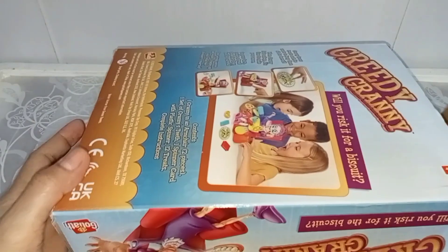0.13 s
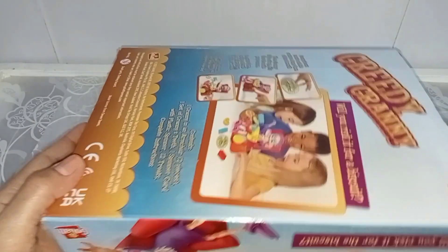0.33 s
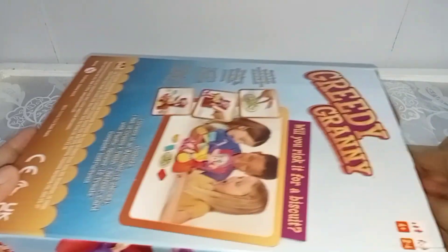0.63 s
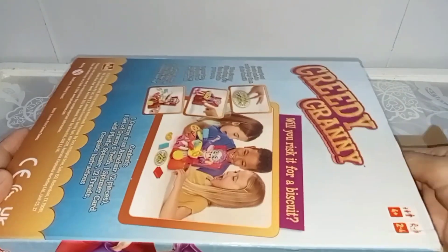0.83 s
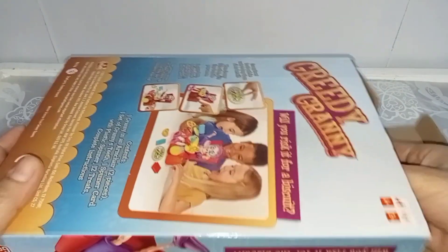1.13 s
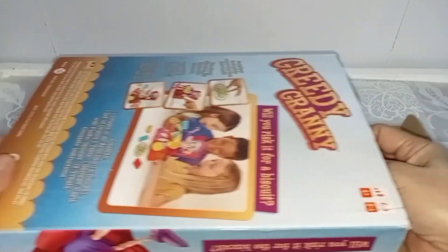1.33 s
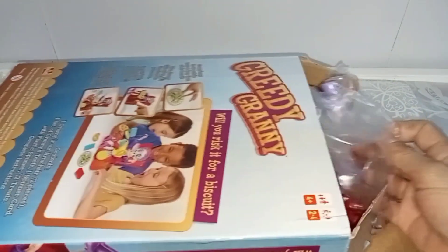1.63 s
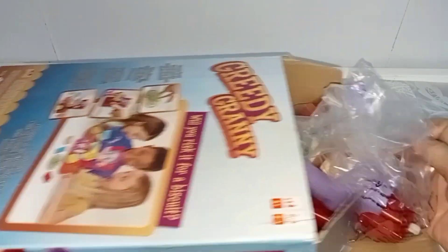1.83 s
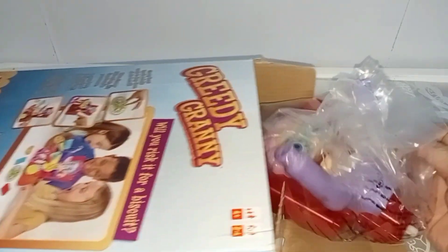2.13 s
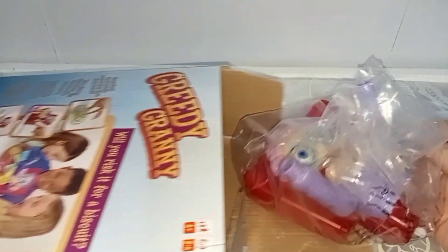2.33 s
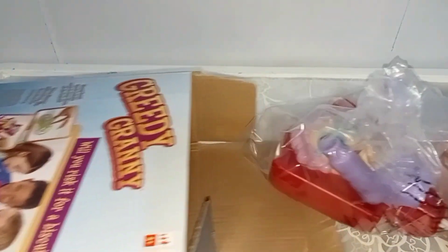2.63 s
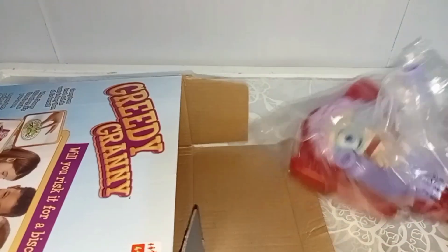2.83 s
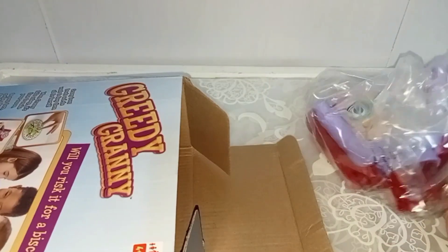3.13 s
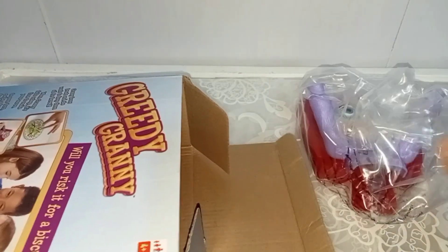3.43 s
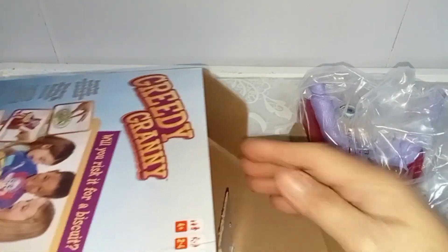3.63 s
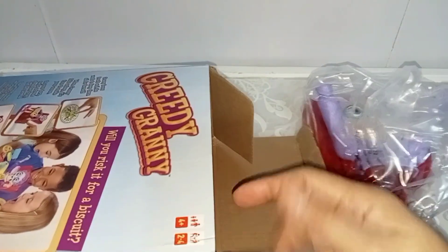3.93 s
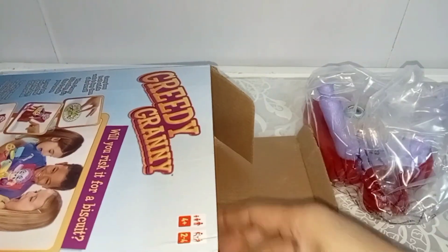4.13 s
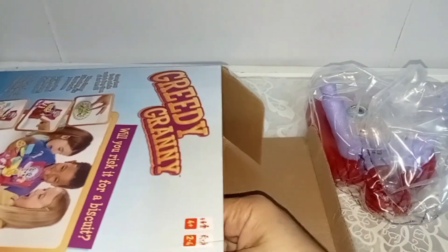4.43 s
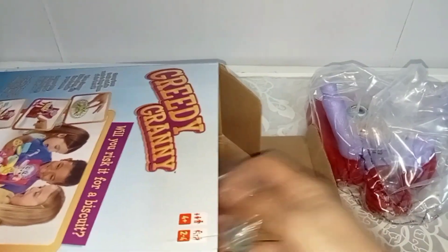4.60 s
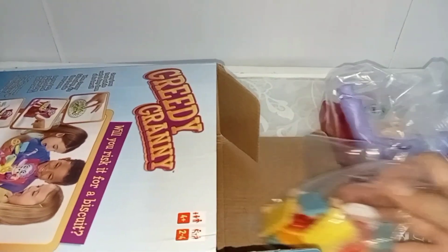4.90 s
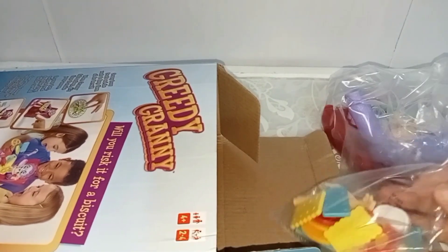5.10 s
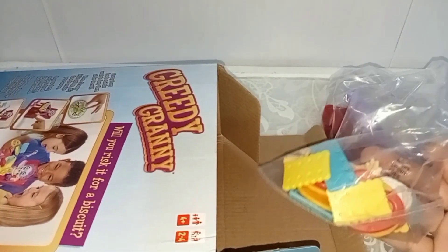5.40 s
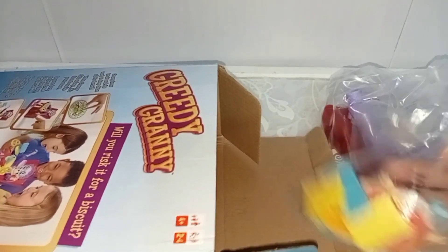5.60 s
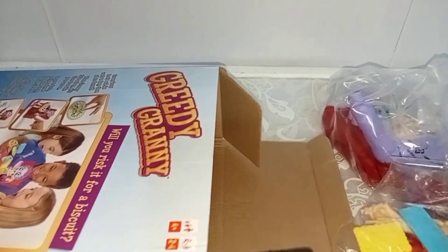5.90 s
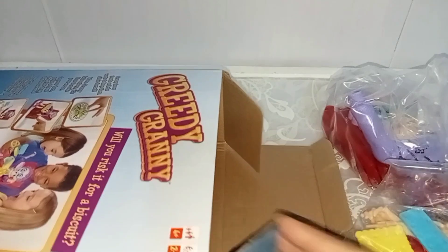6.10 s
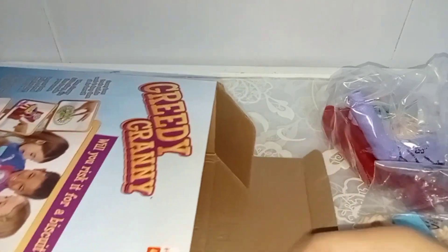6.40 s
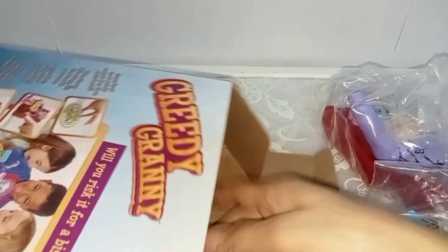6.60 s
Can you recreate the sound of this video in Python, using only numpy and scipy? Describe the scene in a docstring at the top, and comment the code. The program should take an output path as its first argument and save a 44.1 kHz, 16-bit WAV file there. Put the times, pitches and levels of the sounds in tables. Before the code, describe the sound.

Hands turn and open a hollow cardboard box close up, then crackling plastic bags of hard parts are pulled out, rustling and clacking.

```python
"""A small room, a cardboard box on a table, hands working close to a phone's microphone.
The hands turn and open the box and pull out film bags of hard plastic parts.
Film rustles in dense tiny creases and snaps in noisy cracks; the hollow box thumps and scrapes through its modes;
the parts clack as decaying partials. Behind them, two wavering motor lines and coloured noise for the hush."""
import sys
import numpy as np
from scipy import signal
from scipy.fft import rfft, irfft
from scipy.io import wavfile
from scipy.ndimage import uniform_filter1d

SR = 44100
rng = np.random.default_rng(int(sys.argv[2]) if len(sys.argv) > 2 else 0)


def to_wav(sig):
    """Store sig (one row per channel, or 1-D mono) as 16-bit WAV at the path in sys.argv[1].

    Samples outside -1..1 are clipped; the rate is SR.
    """
    pcm = np.clip(np.atleast_2d(sig), -1, 1) * 32767
    pcm = np.round(pcm).astype(np.int16)
    wavfile.write(sys.argv[1], SR, pcm.T)  # frames by channels


N = 297675  # samples, 6.75 s


def undb(db):
    """Decibels to an amplitude factor."""
    return 10 ** (np.asarray(db) / 20)


def level(x, db):
    """Sets the rms level in dB."""
    return x * undb(db) / np.sqrt(np.mean(x ** 2))


def fade(t60, size):
    """Falls 60 dB in t60 seconds."""
    return np.exp(-np.log(1000) * np.arange(size) / SR / t60)


def swell(rise_ms, size):
    """Grows smoothly from 0 to 1 in rise_ms."""
    rise = rise_ms * SR / 1000
    return np.sin(np.pi / 2 * np.minimum(np.arange(size) / rise, 1)) ** 2


def band(x, hz, width_hz):
    """One resonance, gain 1 at the centre."""
    return signal.lfilter(*signal.iirpeak(hz, hz / width_hz, fs=SR), x)


def double_band(x, hz, width_hz):
    """The same resonance twice in a row, for steeper sides."""
    return band(band(x, hz, width_hz), hz, width_hz)


def colour(x, points):
    """Shapes a noise by (f/Hz, level/dB) points."""
    hz, db = np.transpose(points)
    grid = np.maximum(np.arange(len(x) // 2 + 1) * SR / len(x), 1)
    return irfft(rfft(x) * undb(np.interp(np.log(grid), np.log(hz), db)), len(x))


def smooth(x, size):
    """Averages twice over size samples."""
    return uniform_filter1d(uniform_filter1d(x, size=size), size=size)


def walk(rate):
    """Random values around 0, held 1 / rate s and slewed twice."""
    k = int(SR / rate)
    held = np.repeat(rng.standard_normal(N // k + 1), k)
    return 0.84 * smooth(held, k)[:N]


def add(out, s, sound, db):
    """Places a sound at s seconds with its peak at db."""
    i = int(s * SR)
    sound = sound[:N - i]
    out[i:i + len(sound)] += sound * undb(db) / np.abs(sound).max()


def ring(modes, gain_db, stretch, rough):
    """Decaying partials of a struck body; a rough contact makes each one flutter in its own way."""
    size = len(rough)
    t = np.arange(size) / SR
    out = np.zeros(size)
    for k, ((hz, db, t60), gain) in enumerate(zip(modes, gain_db)):
        flutter = undb(db + gain + np.roll(rough, 997 * k))
        out += flutter * np.sin(2 * np.pi * hz * t) * fade(t60 * stretch, size=size)
    return out


def creases(per_s, spread_db, t60):
    """Envelope of many small slips of unequal size, each starting softly and dying fast."""
    sizes = undb(spread_db * np.clip(rng.standard_normal(N), -3, 2.2))
    starts = (rng.random(N) < per_s / SR) * sizes
    soft_power = uniform_filter1d(starts ** 2, size=130)
    power = signal.lfilter([1], [1, -fade(t60 / 2, size=2)[1]], soft_power)
    return np.sqrt(power + 1e-12)


# the hands never rest: (t/s, faint film rustle level/dB, box scrape level/dB)
FIDGETING = [(0, -59, -56), (.6, -61, -54.5), (.9, -60, -54.5), (1.1, -58, -56.5), (1.4, -58, -52.5),
             (1.6, -53, -44), (1.75, -62.5, -53), (2.02, -69, -56), (2.55, -70, -53), (3.01, -70.5, -55.5),
             (3.2, -72, -61), (3.41, -70, -61), (3.87, -67.5, -58), (4.09, -67, -60), (4.55, -62, -49.5),
             (4.85, -49, -45.5), (5.1, -56.5, -54.5), (5.37, -72.5, -55), (5.63, -64, -62.5),
             (5.82, -42.5, -39.5), (5.98, -62.5, -59.5), (6.25, -65.5, -55), (6.5, -61, -54),
             (6.75, -57, -54)]
FIDGET_LOW_DB = 0  # film rustle under 4 kHz, over the part above
# each tug, push or turn: (t/s of its peak, rustle level/dB, t/s to rise 20 dB, t/s to fade 20 dB,
# part under 4 kHz over rustle level/dB, box scrape over rustle level/dB); rises and fades last 0.01 s at least
HAND_MOVES = [(0.002, -38.5, 6, 0.03, 1.5, 0), (0.14, -55, -0.5, 1, -1.5, 0),
              (0.379, -47.5, -0.02, 0.24, -2.5, -13), (0.477, -44.5, 0.03, 0.03, 3, 9.5),
              (0.723, -42.5, 0.08, 0.2, -1.5, -2), (0.97, -39, 0.04, 0, -7, -5),
              (1.09, -57, 0.6, 0.6, -18, 12.5), (1.239, -39, 0.13, 0.13, -5, 0),
              (1.37, -59, -0.1, -0.7, 9, 4), (1.48, -50, 0.07, 0.2, 3.5, 4.5),
              (1.672, -41.5, 0.1, 0.08, -5.5, 0.5), (1.827, -48, 0.12, 0.21, 2.5, 4),
              (2.15, -54, 0.08, 0.7, -0.5, 4), (2.36, -55, 0.5, 0.33, -1.5, 8.5),
              (2.674, -56.5, -0.64, 0.3, -2, 8), (2.87, -56, 0.16, 0.3, 5, 9.5),
              (3.031, -41, 0, 0.0949, 1, 5), (3.085, -57.5, 0.13, 0.22, 6, 14),
              (3.295, -48, 0.15, 0.1, -4, 2), (3.622, -59.5, 0.18, 0.14, 1, 12),
              (3.926, -57.5, -0.2, 0.24, -6, 5.5), (4.11, -53.5, -0.1, 0.4, 0, 5),
              (4.245, -46.5, 0.14, 0.24, -3.5, -20), (4.38, -47, 0.08, 0.06, 3, 1),
              (4.458, -44, 0.05, 0.23, -1.5, 6.5), (4.606, -31, 0.0042, 0.0239, -2, -12),
              (4.645, -40, 0.0859, 0.08, 4, -2), (4.698, -35.5, 0.0743, 0.05, -3, -8.5),
              (4.76, -43, -0.12, -0.34, -12, -5), (4.979, -45.5, 0, -0.12, -7, -2),
              (5.119, -50, -0.35, 0.15, 4, -20.5), (5.269, -42, 0.05, 0.05, 3.5, -21.5),
              (5.679, -46.5, 0.06, 0.3, 5, 3), (5.754, -35, -0.18, 0.03, -17, -6),
              (5.887, -23.5, -0.0454, 0.02, -9, -26), (6.115, -64.5, 0.03, 0, -8, 12.5),
              (6.198, -61, 0.1, 0.3, 4, 5.5), (6.3, -52, 0, 0.07, 7, 2), (6.341, -48, 0.03, 0.11, 2.5, 7),
              (6.428, -32, 0.0238, -0.07, -9, -1.5), (6.551, -51, 0.17, 0.02, 0, 8.5),
              (6.67, -52, 0.3, 0.5, -5.5, 8)]


def handling():
    """Levels of rustle, its lower part and the box scrape: tugs swell and fade over the fidgeting."""
    t = np.arange(N) / SR
    s, film_db, box_db = np.transpose(FIDGETING)
    idle_db = [np.interp(t, s, db) for db in (film_db, film_db + FIDGET_LOW_DB, box_db)]
    power = undb(2 * np.array(idle_db))  # twice the dB makes a power
    for s, db, rise_s, fade_s, low_db, scrape_db in HAND_MOVES:
        away = np.where(t < s, (s - t) / max(rise_s, .01), (t - s) / max(fade_s, .01))
        power = power + undb(2 * (db - 20 * away)) * undb(2 * np.array([[0], [low_db], [scrape_db]]))
    return 10 * np.log10(power)


# spectrum of bare film noise: (f/Hz, level/dB per Hz)
FILM_SPECTRUM = [(590, 1), (1000, 0), (1220, -8), (1330, -3), (1580, -2), (2020, -3), (2540, -1),
                 (4410, 1.5), (6660, -3), (9300, -2.5), (10800, -6), (15600, -9.5)]
CREASES_PER_S, CREASE_SPREAD_DB, CREASE_T60_S = 250, 6, .014


def rustle(high_db, low_db):
    """Tiny creases crackle all over the bag; each patch of film sounds in its own narrow range."""
    low, high = 0, 0
    shared = creases(CREASES_PER_S, CREASE_SPREAD_DB, CREASE_T60_S)
    stir = walk(35)
    # a gentle hand makes the film glide smoothly, a firm one makes it crackle
    glide = undb(np.clip(-.5 * (high_db + 46), -3, 8))
    for hz in 1100 * 2 ** np.arange(0, 4, .2):
        own = creases(40, 6, .04)
        grain = level(shared, -2) + level(own, 0) + glide
        patch = double_band(rng.standard_normal(N) * grain, hz, hz / 5)
        patch = patch * undb(1.66 * stir + 2.7 * walk(12))
        if hz < 4000:
            low = low + patch
        else:
            high = high + patch
    even = 1 / np.sqrt(1.6 + glide ** 2)  # offsets the power that gliding adds
    low = level(colour(low * even, FILM_SPECTRUM), 0)
    high = level(colour(high * even, FILM_SPECTRUM), 0)
    return low * undb(low_db) + high * undb(high_db)


# creases of the film letting go: (t/s, peak level/dB, ring f/Hz, low part over high part level/dB,
# rise t/ms before a common 0.5 ms is added, fall t60/s, 0.003 s at least)
CREASE_SNAPS = [(.122, -29.5, 3630, -6.5, 6.1, 0.057), (.098, -37.5, 9500, -13.5, 1.8, .02),
                (.165, -35, 4620, 2, 5.1, 0.068), (.362, -26, 12800, 0, 5.4, 0.027),
                (.366, -21, 8450, 4, 6.3, 0.026), (.4542, -20, 3030, -1, 3.6, 0.032),
                (.527, -34.5, 8900, 3, 1, 0.029), (.695, -27.5, 5000, -1, 7.6, 0.032),
                (.7105, -37, 11500, 4, 0.75, 0.0069), (.744, -30, 9500, 7, 1.2, 0.017),
                (.7851, -23.5, 6360, -4, 0.55, .011), (.8072, -26, 1630, 0, 0.49, 0.01),
                (.858, -31.5, 3800, 11, 0.88, 0.017), (.9088, -33.5, 3920, 9, 1.1, 0.008),
                (.9498, -16.5, 10500, -36, 1.4, 0.008), (.9603, -13, 6600, -1.5, 0.57, 0.012),
                (.9675, -35, 8000, -28, 0.61, 0.0092), (.9738, -21.5, 9600, -24, 0.86, .015),
                (.987, -27.5, 4500, 2, .6, 0.0094), (1.0107, -25.5, 7750, -9, 0.98, 0.015),
                (1.063, -28.5, 2580, 7, 4.7, 0.024), (1.09, -31.5, 2620, -3, 8.1, .03),
                (1.107, -25, 7060, -8, 0.44, 0.0057), (1.148, -26, 2650, 1, 3.2, 0.026),
                (1.1644, -27, 3370, -4, 1.7, 0.013), (1.2035, -11, 9400, -3, 1.1, 0.013),
                (1.2287, -19.5, 2350, -14, 1, 0.0081), (1.2437, -18, 9800, -16, 0.77, .01),
                (1.2542, -16, 7200, -9, 0.35, 0.016), (1.2634, -35, 6500, -12, 0.56, 0.007),
                (1.2805, -13, 9800, -9, 0.53, 0.024), (1.2864, -21.5, 1620, -1, 1.3, 0.022),
                (1.2933, -40, 7940, -1, 4.1, 0.015), (1.3074, -29, 5440, -11, 0.45, 0.005),
                (1.3184, -25, 7500, -13.5, 0.5, .007), (1.3408, -27, 8100, -15, .7, 0.0051),
                (1.3584, -19, 9200, -3, 0.29, 0.015), (1.3767, -26, 9900, -1, 0.57, 0.0081),
                (1.3864, -26, 5500, -4, 0.8, 0.0079), (1.3937, -25, 6250, -10, 0.68, .006),
                (1.4216, -18, 10000, -17, 0.41, 0.011), (1.4295, -25, 9990, -15, 0.54, .007),
                (1.4448, -28, 9000, -12, .5, .005), (1.4476, -16.5, 4720, -3, 0.66, 0.0074),
                (1.462, -18, 4300, -1, 0.69, 0.0044), (1.479, -25, 3470, -14.5, 0.52, 0.0048),
                (1.485, -20, 6600, -12, 0.68, 0.0082), (1.4934, -21.5, 2850, 5, 3.3, 0.015),
                (1.509, -20, 9700, -7, 0.77, 0.015), (1.533, -26, 5500, 2, .7, 0.025),
                (1.5465, -17, 9400, -25, 0.67, 0.0058), (1.565, -26.5, 8960, 9.5, 0.99, 0.013),
                (1.6217, -29, 3460, 8, 0.89, 0.008), (1.6387, -31, 6500, 7, .8, .015),
                (1.67, -21, 5800, 0, 0.91, 0.02), (1.684, -25.5, 1440, 23, 0.74, 0.028),
                (1.7928, -34.5, 1650, -2, 1.4, 0.034), (1.8203, -27.5, 1540, 1, .6, 0.0075),
                (1.837, -33, 1510, 4.5, 1.2, 0.047), (1.9714, -42, 2080, 2, 1, 0.011),
                (2.0464, -22.5, 6530, -14, 0.65, 0.0073), (2.3294, -37, 3420, 5, 2, 0.025),
                (2.434, -39, 10100, -18, 1.8, 0.056), (2.577, -38, 1560, -1, .4, .015),
                (2.6063, -30, 3500, 20, 0.58, 0.023), (2.6146, -31, 8270, -14, 0.57, 0.0072),
                (2.6522, -14, 5700, -8, 0.18, 0.011), (2.7137, -40, 2870, -1, 1.7, .025),
                (2.75, -35, 4160, -5, 0.77, 0.021), (2.8212, -27, 4280, -8, 3.2, 0.0083),
                (2.8439, -33, 3200, 5, 1.4, 0.015), (2.865, -21.5, 9500, -11.5, 0.23, 0.0028),
                (2.8772, -23, 4770, 0, 0.51, 0.0078), (2.8938, -32, 2260, 0, 0.78, 0.023),
                (2.9114, -35, 5000, 7.5, .6, 0.0065), (2.9274, -36, 4000, -4, .6, .008),
                (2.936, -33, 4570, 12, 0.88, 0.021), (2.9577, -41, 2860, 8, 0.64, .008),
                (2.9711, -35, 3400, 9, .7, .01), (2.9926, -28.5, 2930, -1, .4, 0.0058),
                (3.012, -30, 3100, -10, 0.6, 0.0089), (3.0233, -25.5, 9800, 8, 0.75, 0.17),
                (3.03, -28, 1010, 0, 6.1, 0.13), (3.0527, -28, 9470, -9, 1.1, 0.012),
                (3.1364, -21.5, 9700, -4, 0.73, 0.015), (3.1556, -30.5, 3130, 10, .5, 0.011),
                (3.1846, -30, 4860, -17.5, 1.1, 0.0069), (3.2084, -31.5, 2280, 5.5, 0.63, 0.014),
                (3.2238, -30, 1390, -10, 0.77, 0.0079), (3.235, -30.5, 2770, -6, .7, 0.015),
                (3.2592, -16.5, 10100, -29, 0.47, 0.0046), (3.2675, -25, 9900, -17, 0.48, 0.0078),
                (3.2877, -22, 9300, -5, 0.33, 0.0095), (3.3017, -19, 1850, -1, 0.24, 0.0058),
                (3.3347, -27, 1600, 4, 0.65, 0.011), (3.4106, -45, 6000, -10, 0.55, .006),
                (3.4255, -37, 1720, 4, 0.99, 0.012), (3.505, -22.5, 9800, -12, 0.21, 0.018),
                (3.6, -41, 2700, 5, 2, 0.026), (3.6325, -38, 2740, 4, 3, 0.011),
                (3.702, -45, 3750, 8, 1.6, .015), (3.911, -46, 9700, -1, 1.5, 0.061),
                (4.0594, -47.5, 6530, -4, 1.9, .015), (4.105, -35, 2630, 2, 0.65, 0.039),
                (4.2, -28.5, 2630, -1, 0.63, .016), (4.3814, -28, 8700, -18, 0.93, 0.033),
                (4.4338, -23.5, 5670, -6.5, 0.64, 0.096), (4.4467, -21, 10000, -14, 0.82, 0.053),
                (4.475, -7, 10600, -39, 0.41, 0.0086), (4.5032, -25, 3930, 4, 6.7, 0.036),
                (4.5629, -22.5, 10200, -5.5, 0.75, 0.012), (4.5772, -32, 7000, -15, .4, .004),
                (4.5905, -31, 9400, -16, 1.5, 0.014), (4.5811, -19, 7150, -19, 0.45, 0.03),
                (4.598, -17.5, 8800, -18, 0.62, 0.023), (4.6084, -24, 7450, -15, 0.88, 0.011),
                (4.6224, -21, 3930, -7, 1.5, .02), (4.6603, -22.5, 1960, -1, 1.7, 0.022),
                (4.6704, -24, 2850, -2.5, 1, 0.016), (4.695, -23, 2020, -8, 2.6, 0.051),
                (4.7104, -15, 9200, -14, .3, 0.0026), (4.728, -23.5, 2080, -11, 1.2, 0.23),
                (4.7495, -27.5, 9900, -6, 8.5, 0.092), (4.7794, -27, 1850, 8, 1, .03),
                (4.864, -22, 5700, -7, 0.65, 0.0076), (4.872, -23.5, 4500, 1, 0.71, 0.012),
                (4.891, -30, 4360, -14, 2, .006), (4.93, -21, 9300, -19, 0.93, 0.0073),
                (4.967, -23, 2450, -4, 0.77, 0.0072), (4.9754, -23.5, 4430, -12, 0.49, 0.0065),
                (4.9934, -29, 5530, -6, .7, .008), (5.0157, -21.5, 3260, -9, 0.56, 0.012),
                (5.0381, -21, 9050, 3, 0.52, 0.017), (5.1045, -21, 4170, -29, 4, 0.057),
                (5.158, -30, 9600, 13, 0.41, 0.0042), (5.177, -31, 6000, 5, 1.2, 0.064),
                (5.2176, -20.5, 2250, 0, 0.16, 0.0092), (5.2258, -20.5, 2270, -7, 0.51, 0.0054),
                (5.248, -19.5, 9200, -31, 1.8, 0.026), (5.3007, -19.5, 8700, -30, 0.65, 0.016),
                (5.3235, -30.5, 2900, 23, 0.76, 0.018), (5.3426, -35.5, 9200, -0.5, 1.5, 0.015),
                (5.39, -40.5, 2220, 11, 0.55, 0.0093), (5.406, -44, 7000, 7, .6, 0.0097),
                (5.424, -42, 2270, 5, 0.67, 0.011), (5.5742, -39, 3900, -17, 0.51, 0.024),
                (5.655, -24.5, 5340, -0.5, 14, 0.065), (5.7322, -22, 9350, 4, 0.64, 0.074),
                (5.7554, -24, 5200, 6, 2, 0.099), (5.7756, -20, 7800, -1, .5, 0.011),
                (5.7912, -29, 6140, 8, 2.1, 0.016), (5.8256, -26, 10160, -11, .7, 0.024),
                (5.8335, -13.5, 6800, -22, 0.84, 0.0051), (5.8485, -17.5, 9400, -2, .7, 0.037),
                (5.869, -7.5, 11000, -30, 3.4, 0.026), (5.9335, -26, 5330, -1, 1.7, 0.065),
                (6.0978, -27.5, 10400, -2.5, 0.4, 0.037), (6.1174, -38.5, 2500, -8.5, 1.6, 0.014),
                (6.3142, -26.5, 3170, -1.5, 0.57, 0.021), (6.3332, -21, 2470, -7, 1.6, 0.0026),
                (6.39, -32, 9100, 5, 16, 0.11), (6.422, -25.5, 8900, -3.5, 8.8, 0.068),
                (6.4404, -27.5, 2860, 9, 1.7, 0.026), (6.521, -39, 9470, -12, 2.4, .031),
                (6.539, -20.5, 2560, 1, 0.81, 0.024), (6.5495, -22.5, 2160, 6, 0.7, 0.018),
                (6.6009, -36, 3880, -8, 1.5, .015), (6.651, -13.5, 10270, -3, 5.8, 0.016),
                (6.654, -26, 13500, -12, 1.5, 0.027)]
# the patch's ring over the crack at 4 kHz; larger, lower patches ring more
SNAP_RING_DB, RING_DB_PER_OCTAVE = -5, -1.5


def snaps(rows):
    """A noisy crack, partly ringing at the pitch of the buckled patch."""
    out = np.zeros(N)
    size = 4096
    for (s, db, hz, low_db, rise_ms, t60), noise in zip(rows, rng.standard_normal((len(rows), size))):
        rise = swell(rise_ms + 0.5, size=size)
        risen = rise >= 1
        fall = np.ones(size)
        fall[risen] = fade(max(t60, .003), size=size)[:np.sum(risen)]
        burst = colour(noise, FILM_SPECTRUM) * rise * fall
        hiss = np.diff(noise * rise * fade(0.004, size=size), prepend=0)
        high = band(burst, 7700, 7900) + undb(-4.5) * hiss
        # a quick release has a sharp tick where the rise ends
        tick = undb(9 - 4.8 * rise_ms) * np.abs(high).max() / 2 * np.array([1, -1])
        high[np.argmax(risen):][:2] += tick
        low = double_band(burst * swell(1.0, size=size), 2150, 4800)
        crack = level(high, 0) + level(low, low_db)
        ring_db = SNAP_RING_DB + RING_DB_PER_OCTAVE * np.log2(hz / 4000)
        patch_ring = level(double_band(burst, hz, hz / 5), ring_db)
        add(out, s, level(crack, 0) + patch_ring, db)
    return out


SMALL_SNAPS = 25
SMALL_OVER_RUSTLE_DB, SMALL_RISE_MS, SMALL_T60_S = 18.5, 0.32, 0.052  # the rise before the common 0.5 ms


def small_snaps(rustle_db):
    """Rows of lesser creases that come by chance, louder where the film is busy; low-ringing ones are duller."""
    when, pitch, size = rng.random((SMALL_SNAPS, 3)).T
    at = (when * (N - 1)).astype(int)
    peak_db = np.minimum(rustle_db[at], -45) + SMALL_OVER_RUSTLE_DB + 8 * (size - .5)
    rows = []
    for i, db, p in zip(at, peak_db, pitch):
        rows.append((i / SR, db, 1500 * 7 ** p, 4 - 12 * p, SMALL_RISE_MS, SMALL_T60_S))
    return rows


# modes of the panels and the air inside: (f/Hz, level/dB, t60/s of a usual ring)
BOX_MODES = [(110, -16.5, 0.056), (172, -6, 0.044), (228.3, -5, 0.047), (301.5, -1.5, 0.037),
             (332.7, -1.5, 0.051), (380, -12.5, 0.038), (472.5, -6, 0.03), (598.5, -7, 0.019),
             (774.6, -0.5, 0.032), (834.4, -2.5, 0.029), (1016, -9, 0.02), (1210, -16.5, 0.017),
             (1690, -22, 0.012), (2150, -23.5, 0.048)]
# blows on the box: (t/s, peak level/dB, f/Hz the struck spot favours, spread around it/octaves,
# contact t/ms, length of the ring, 1 = usual)
BOX_BLOWS = [(0.0,-32.5,330,1.1,2.4,0.77),(0.364,-41,850,0.66,4,1),(0.741,-41,280,1.2,2.6,1),(0.793,-32.5,700,0.9,3.7,1),(0.866,-37,198,0.47,4.6,1.04),
             (0.957,-36,400,1.2,4,1.2),(1.04,-23,315,0.77,2.7,0.86),(1.065,-38.5,958,0.68,3.3,0.93),(1.146,-39,974,0.6,4.5,1.6),(1.227,-34,560,0.55,4.9,1.5),(1.25,-36,262,0.65,8.5,1),
             (1.271,-37,673,0.5,3.4,1.5),(1.287,-35,320,0.66,3.4,0.8),(1.357,-32,550,1.5,1.6,.8),(1.375,-36,450,0.64,2,.6),(1.492,-28,503,1,4.9,1.4),
             (1.552,-31,300,0.77,4.2,0.67),(1.564,-33.5,800,0.68,4,1),(1.595,-32.5,369,0.8,5.4,1.3),(1.665,-34,318,0.5,9,2.7),(1.792,-37,328,1.2,4.6,0.97),
             (1.946,-32,333,0.86,5,2),(2.198,-41,266,0.74,4.9,1.5),(2.571,-40,353,0.68,3.6,1.5),(2.891,-29.5,643,0.62,3.7,1.05),(3.023,-32,1010,0.75,4,2.2),(3.05,-33,900,.7,9.8,3),
             (3.505,-41,326,1,2.8,0.83),(3.912,-32,300,1.8,3.9,1.35),(4.106,-32.5,350,1.5,2.7,1.1),(4.134,-38.5,200,0.76,4.3,1.5),(4.204,-37,185,0.5,5.4,1.8),
             (4.231,-40,608,0.4,3.3,1.1),(4.311,-42,700,0.68,4,1),(4.376,-29,523,1.3,3.3,1),(4.443,-30,721,0.89,4.6,1.5),(4.494,-30,804,1.1,3.9,1.3),
             (4.633,-25.5,500,1.3,3.5,1.3),(4.654,-25,706,0.76,4.2,1.7),(4.679,-34,762,0.7,4.6,1.4),(4.739,-33,861,0.47,4,2.3),(4.829,-34.5,821,0.7,6.1,1.9),
             (5.277,-43,727,0.94,3.7,1.2),(5.675,-34,250,1.2,2.7,1.05),(5.715,-34,139,.6,5.4,0.91),(5.846,-31,834,0.73,2.3,1),(5.868,-33.5,250,2.3,2.7,0.98),(6.037,-36.5,790,0.56,4.1,2),
             (6.097,-29,900,0.63,1.2,1.4),(6.1,-32,179,.5,3,1.3),(6.2,-38,330,1.1,4.6,1.2),(6.475,-46,371,0.66,3.6,1),(6.52,-26,326,0.89,2.3,2),(6.539,-30,222,0.77,6.5,1.3),(6.547,-19.5,565,1.1,4,1.3),
             (6.576,-32,450,1,3.5,1.1),(6.653,-21.5,650,1.4,3,1.5),(6.674,-33,740,0.42,5.1,2.2),(6.695,-34,500,1.4,3.7,1.5)]


def box(scrape_db):
    """Blows ring the panels and the air inside; sliding board shakes the same modes."""
    out = np.zeros(N)
    octaves = np.log2(np.array(BOX_MODES)[:, 0] / 330)
    chances = rng.standard_normal((len(BOX_BLOWS), 8192))
    for (s, db, spot_hz, spread, contact_ms, stretch), chance in zip(BOX_BLOWS, chances):
        # the spot struck favours the modes near its pitch
        near_db = -6 * ((octaves - np.log2(spot_hz / 330)) / spread) ** 2
        # each mode's pitch strays a little by chance from blow to blow
        strayed = [(hz * (1 + 0.038 * c), mode_db, t60) for (hz, mode_db, t60), c in zip(BOX_MODES, chance)]
        rough = level(smooth(chance, 200), 0) * 4.1  # dB of flutter
        add(out, s, ring(strayed, near_db, stretch, rough) * swell(contact_ms, size=8192), db)
    slips = rng.standard_normal(N) * (level(creases(110, 4.4, 0.028), 0) + undb(1.0))
    scrape = np.zeros(N)
    for k, (hz, db, t60) in enumerate(BOX_MODES):
        # sliding favours the upper panel modes
        gain = undb(db + 1.5 * octaves[k] + 2.63 * walk(12))
        scrape += (-1) ** k * gain * band(slips, hz, 9 / t60)
    return out + level(scrape, -1.17) * undb(scrape_db)


# modes of the hard parts: (f/Hz)
PART_MODES_HZ = [2070, 2990, 3770, 4416, 4452, 4900, 5155, 5213, 5835, 7580, 8662, 9038, 9417, 9764, 11180,
                 12850, 13090]
# the same modes: (level/dB, t60/s of a usual ring)
PART_MODE_RING = [(-3, 0.057), (-10, 0.18), (-28, .15), (-5.5, 0.36), (3, 0.17), (2.5, 0.13), (4.5, 0.079),
                  (-5, 0.31), (-16, 0.13), (-8, 0.13), (-3, 0.28), (1.5, 0.18), (-7, 0.28), (-1.5, 0.14),
                  (-3.5, 0.26), (-5, 0.12), (-22, .12)]
# parts knocking together: (t/s, peak level/dB, length of the ring, 1 = usual)
PART_CLACKS = [(4.502, -24, 0.21), (4.683, -47.5, 0.56), (4.753, -34, 0.23), (5.25, -41, 0.56),
               (5.27, -34, 0.23), (5.3007, -29, 0.092), (5.344, -35, 0.088), (5.756, -24, 0.42),
               (5.8705, -10, 0.68)]
# parts jostling in the second bag: (t/s, rattle over rustle level/dB)
BAG_JOSTLE = [(4.4, -36), (4.47, -11), (4.7, -3.5), (5.0, -16), (5.27, -1), (5.4, -22), (5.8, -1),
              (6.05, -7), (6.75, -10)]


def parts(rustle_db):
    """Hard pieces ring briefly, chattering against their neighbours; light touches keep the modes alive."""
    out = np.zeros(N)
    size = 12000
    modes = [(hz, db, t60) for hz, (db, t60) in zip(PART_MODES_HZ, PART_MODE_RING)]
    chances = rng.standard_normal((len(PART_CLACKS), size))
    for (s, db, stretch), chance in zip(PART_CLACKS, chances):
        chatter = level(smooth(chance, 120), 0) * 5.9  # dB of flutter
        tone = ring(modes, 1.3 * chance[:len(modes)], stretch, chatter) * swell(2.6, size=size)
        rattle = colour(chance, FILM_SPECTRUM) * swell(1.9, size=size) * fade(0.34 * stretch, size=size)
        add(out, s, level(tone, 0) + level(rattle, -5.5), db)
    touches = np.zeros(N)
    for hz, db, t60 in modes:
        # each mode belongs to a piece that is touched at its own moments
        moments = rng.standard_normal(N) * creases(29, 1.8, 0.096)
        touches += undb(db) * band(moments, hz, 9 / t60)
    jostle_db = np.interp(np.arange(N) / SR, *np.transpose(BAG_JOSTLE))
    return out + level(touches, 0) * undb(rustle_db + jostle_db)


ROOM_T60_S, ROOM_DB = 0.094, -12


def room_reply(near):
    """The walls answer after 5 ms with a dull, dense tail."""
    size = SR // 2
    tail = signal.lfilter([1], [1, -.2], rng.standard_normal(size)) * fade(ROOM_T60_S, size=size)
    tail = np.concatenate([np.zeros(int(.005 * SR)), tail / np.sqrt(np.sum(tail ** 2))])
    return undb(ROOM_DB) * signal.fftconvolve(near, tail)[:N]


# lines of the small motor: (f/Hz, rms level/dB around which it wavers)
MOTOR_LINES = [(80.7, -57.5), (161.5, -53.5)]


def motor_hum():
    """Two motor lines, each wavering a little in level and phase."""
    t = np.arange(N) / SR
    hum = np.zeros(N)
    for hz, db in MOTOR_LINES:
        amplitude = np.sqrt(2) * undb(db + 2.7 * walk(9.3))
        hum += amplitude * np.sin(2 * np.pi * hz * t + 0.57 * walk(11.0))
    return hum


# spectral shape of the room's hush: (f/Hz, relative level/dB per Hz)
HUSH_SPECTRUM = [(20, -36), (45, -13.5), (70, -11), (125, -6), (165, -2.5), (260, -21), (500, -26.5),
                 (1000, -33), (1680, -23.5), (2300, -39), (4500, -53), (7000, -79), (9500, -37),
                 (15500, -71)]
HUSH_DB = -55.5  # rms


def room_hush():
    """The steady hush of the room, a noise strongest in the bass."""
    return level(colour(rng.standard_normal(N), HUSH_SPECTRUM), HUSH_DB)


def scene():
    """Hands, film, box and parts close by, with the room's reply and its background."""
    high_db, low_db, scrape_db = handling()
    film = rustle(high_db, low_db) + snaps(CREASE_SNAPS) + snaps(small_snaps(high_db))
    near = film + box(scrape_db) + parts(high_db)
    return (near + room_reply(near) + motor_hum() + room_hush())[None]


BASS_CUT_HZ, TOP_HZ = 52, 15650
PORT_HZ, PORT_WIDTH_HZ, PORT_DB = 9450, 1300, 0  # level of the resonance added to the direct sound


def record(dry):
    """The microphone drops the deep bass and its port rings in the treble; the top is cut."""
    dry = signal.sosfilt(signal.butter(2, BASS_CUT_HZ, "high", fs=SR, output="sos"), dry)
    port = dry + undb(PORT_DB) * band(dry, PORT_HZ, PORT_WIDTH_HZ)
    return signal.sosfilt(signal.ellip(10, .2, 70, TOP_HZ, fs=SR, output="sos"), port)


dry = scene()
out = record(dry)
to_wav(out)
```